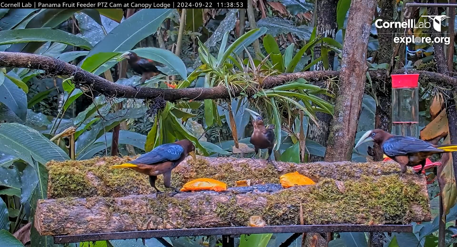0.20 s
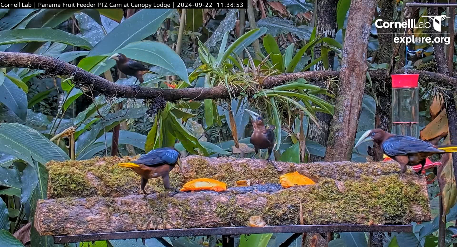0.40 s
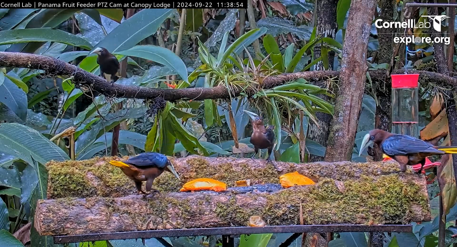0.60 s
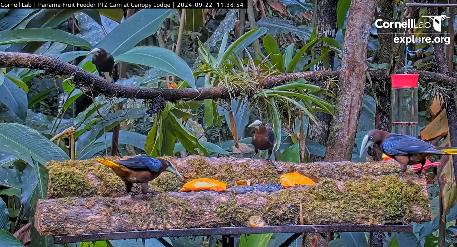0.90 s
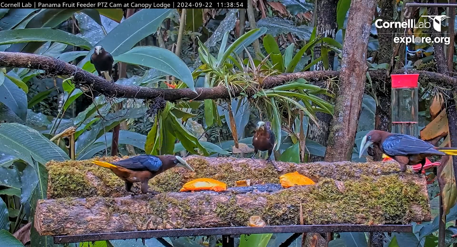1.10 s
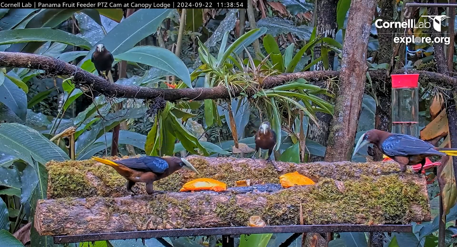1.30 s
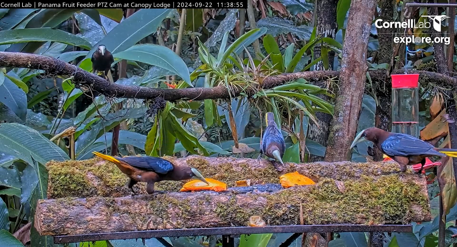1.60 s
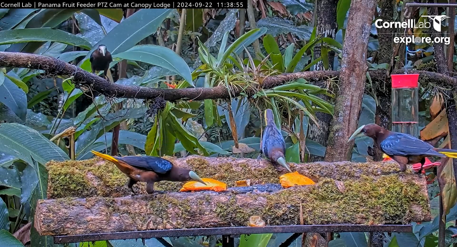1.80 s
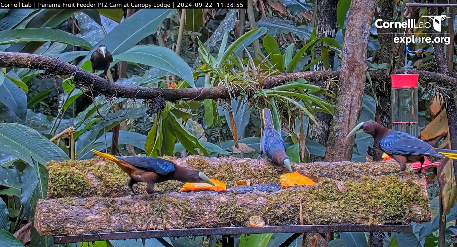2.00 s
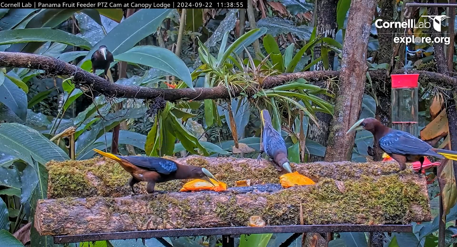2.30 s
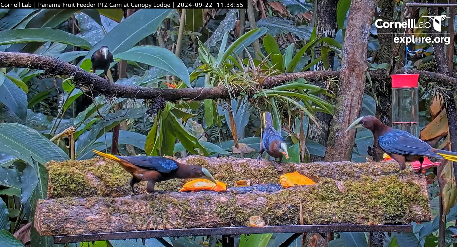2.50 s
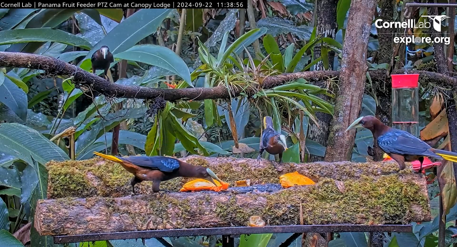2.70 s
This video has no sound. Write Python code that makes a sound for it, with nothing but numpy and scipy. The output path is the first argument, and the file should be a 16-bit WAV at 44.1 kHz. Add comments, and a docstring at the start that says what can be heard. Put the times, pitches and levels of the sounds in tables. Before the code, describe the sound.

Large forest birds give four short, grating chacks above constant rushing water and low rumble

```python
"""A steady stream (shaped noise) and a faint warbling electrical whine (swung sine) run throughout.
Oropendolas at a forest feeder give four harsh "chack" calls, the second with a softer after-note: uneven
syrinx pulses and air noise ring the throat's resonances, with rasp, sizzle and thin falling tones.
Foliage scatters each call into a short noise tail. Late on, an insect starts to trill: a pulsed sine."""
import sys
import numpy as np
from scipy import signal
from scipy.fft import rfft, irfft
from scipy.io import wavfile
from scipy.ndimage import uniform_filter1d

SR = 44100
rng = np.random.default_rng(int(sys.argv[2]) if len(sys.argv) > 2 else 0)


def pcm_store(signal):
    """Save signal as 16-bit PCM."""
    levels = np.round(np.clip(np.atleast_2d(signal), -1, 1) * 32767)
    wavfile.write(sys.argv[1], SR, levels.astype(np.int16).T)


N = 125685

# Spectrum of the stream's low rumble. Each row: frequency in Hz, relative level in dB.
RUMBLE_SPECTRUM = [(25, -57), (45, -46), (60, -21), (76, -25.5), (95, -13), (115, -5), (150, -0.5),
                   (195, -1), (218, -5.5), (250, -2), (310, -7.5), (400, -13), (500, -18.5), (700, -29.5),
                   (1200, -53)]
# Spectrum of the stream's hiss. Each row: frequency in Hz, relative level in dB.
HISS_SPECTRUM = [(400, -30), (750, -16), (1100, -12), (1550, -9.5), (2000, -7), (2350, -3), (2700, 0.5),
                 (3200, -5), (3850, -7), (4450, -16), (6000, -18.5), (9350, -20.5), (9700, -28),
                 (15000, -30.5)]
# Notes of the calls. Each row: start in seconds, attack in seconds, hold in seconds, release in seconds,
# voice level in dB, throat tuning as a ratio, brightness in dB per octave, rasp level in dB,
# sizzle level in dB, sizzle centre in Hz.
CALL_NOTES = [(0.147, 0.027, 0.06, .064, -40.5, 0.94, -4, -46.5, -59, 11900),
              (.897, 0.027, .012, 0.058, -36.5, 0.99, 5.5, -45.5, -63, 13100),
              (.955, 0.017, 0.033, 0.031, -43.5, .99, -4, -63, -69, 12000),
              (1.818, 0.044, 0.013, .074, -32.5, 0.97, 0, -47.5, -61.5, 12500),
              (2.798, 0.038, .028, .045, -32.6, 0.97, 0, -48.5, -56.5, 12400)]
# Throat resonances. Each row: centre in Hz, width in Hz, relative level in dB.
THROAT_RESONANCES = [(1020, 440, -24), (1586, 160, -11.5), (1930, 270, -11), (2420, 197, 0.5),
                     (2760, 210, 1), (3193, 222, 3), (3570, 224, -4.5), (3946, 440, -13),
                     (5360, 940, -30.5), (8140, 1800, -35.5)]
# Thin tones inside the calls. Each row: start in seconds, length in seconds, first pitch in Hz,
# settled pitch in Hz, level in dB.
CALL_TONES = [(0.162, .090, 2520, 2406, -43.5), (.882, .055, 4930, 4750, -57.5),
              (.903, 0.069, 3900, 3080, -40), (.960, 0.055, 3700, 3608, -46),
              (1.818, 0.077, 3514, 3230, -40), (1.850, 0.044, 2800, 2660, -39.5),
              (1.880, 0.057, 3610, 3560, -46), (1.895, 0.062, 2200, 2016, -52.5),
              (2.787, 0.042, 2410, 2280, -48.5), (2.796, 0.058, 3480, 3170, -41),
              (2.820, 0.052, 3006, 2820, -34.5)]
# Level curve of the insect. Each row: time in seconds, level in dB.
TRILL_LEVELS = [(2.40, -85), (2.44, -64), (2.56, -69), (2.63, -71), (2.72, -65.5), (2.85, -63)]

RUMBLE_DB, RUMBLE_SWELL_DB = -48, -0.18
DRONE_HZ, DRONE_WIDTH_HZ, DRONE_DB = 192.5, 21.7, -55
HISS_DB, HISS_FLICKER_DB = -50.5, 0.27
WHINE_HZ, WHINE_SWING_HZ, WHINE_DB, MAINS_HZ = 14025, 150, -68.5, 60
PULSE_HZ, JITTER_LOG_RATIO, SHIMMER_DB = 479.5, 0.2, 1
AIR_DB, AIR_DECAY_CYCLES = -5, 0.98
RATTLE_PER_S, RATTLE_DB = 230, 0.65
BODY_HZ, BODY_WIDTH_HZ, BODY_DB = 2400, 1450, -23.5
RASP_HZ, RASP_WIDTH_HZ, RASP_TOP_HZ, RASP_LEAD_S = 2520, 2900, 5770, 0.025
SIZZLE_WIDTH_HZ, SIZZLE_LEAD_S = 1800, 0.007
TONE_SETTLE_S, TONE_WOBBLE_RATIO = 0.008, 0.00907
FOREST_T60_S, FOREST_DB, FOREST_DELAY_S = 0.48, -10.5, 0.0088
INSECT_HZ, INSECT_PER_S = 5630, 68.5
TOP_HZ = 15300


def undb(db):
    """Decibels to gain."""
    return 10 ** (np.asarray(db) / 20)


def unit(x):
    """Scale to rms 1."""
    return x / np.sqrt(np.mean(x ** 2) + 1e-20)


def walk(rate_hz):
    """Smooth random wander of rms 1, rate_hz new values per second."""
    step = int(SR / rate_hz)
    held = np.repeat(rng.standard_normal(N // step + 1), step)
    return unit(uniform_filter1d(held, step)[:N])


def resonate(x, hz, width_hz):
    """Steep resonance: a band-pass of width_hz applied twice."""
    b, a = signal.iirpeak(min(hz, 0.45 * SR), hz / width_hz, fs=SR)
    return signal.lfilter(b, a, signal.lfilter(b, a, x))


def coloured(points):
    """Noise of rms 1 whose spectrum joins (Hz, dB) points on a log-frequency axis."""
    hz, db = np.array(points).T
    bin_hz = np.maximum(np.arange(N // 2 + 1) * SR / N, 1)
    gain = undb(np.interp(np.log(bin_hz), np.log(hz), db))
    return unit(irfft(rfft(rng.standard_normal(N)) * gain, N))


def sine(hz):
    """Tone of rms 1 that follows a pitch curve."""
    return np.sqrt(2) * np.sin(2 * np.pi * np.cumsum(hz) / SR)


def stream():
    """Low rumble of water with one droning resonance, under an almost even hiss."""
    rumble = coloured(RUMBLE_SPECTRUM) * undb(RUMBLE_DB + RUMBLE_SWELL_DB * walk(5.77))
    drone = undb(DRONE_DB) * unit(resonate(rng.standard_normal(N), DRONE_HZ, DRONE_WIDTH_HZ))
    hiss = coloured(HISS_SPECTRUM) * undb(HISS_DB + HISS_FLICKER_DB * walk(29.8))
    return rumble + drone + hiss


def whine(t):
    """A very high electrical tone, swung in pitch at mains rate, with a small random drift."""
    swing_hz = WHINE_SWING_HZ * np.sin(2 * np.pi * MAINS_HZ * t)
    return undb(WHINE_DB) * sine(WHINE_HZ + swing_hz + 25 * walk(200))


def syrinx():
    """Uneven pulses, each followed by a decaying puff of air, with a fast rattle in level."""
    stretch, size = rng.standard_normal((N // 10, 2)).T
    times = np.cumsum(np.exp(JITTER_LOG_RATIO * stretch)) / PULSE_HZ
    phase = np.interp(np.arange(N) / SR, times, np.arange(len(times)))
    cycle = phase.astype(int)
    pulses = np.diff(cycle, prepend=0) * undb(SHIMMER_DB * size[cycle])
    air = rng.standard_normal(N) * np.exp(-(phase % 1) / AIR_DECAY_CYCLES)
    mix = unit(pulses) + undb(AIR_DB) * unit(air)
    return unit(mix * undb(RATTLE_DB * walk(RATTLE_PER_S)))


def throat(source, tuning, bright_db):
    """Parallel resonances of alternating sign over one broad body resonance; brightness tilts them."""
    voice = undb(BODY_DB) * resonate(source, BODY_HZ, BODY_WIDTH_HZ)
    for k, (hz, width_hz, peak_db) in enumerate(THROAT_RESONANCES):
        gain = (-1) ** k * undb(peak_db + bright_db * np.log2(hz / BODY_HZ))
        voice = voice + gain * resonate(source, hz * tuning, width_hz)
    return unit(voice)


def airy_rasp():
    """Turbulent air: broadly resonant noise with its top rolled off."""
    noise = resonate(rng.standard_normal(N), RASP_HZ, RASP_WIDTH_HZ)
    return unit(signal.sosfilt(signal.butter(2, RASP_TOP_HZ, fs=SR, output="sos"), noise))


def chacks(t):
    """The syrinx rings the throat in short swells; an airy rasp and a high sizzle start just ahead."""
    source, rasp, out = syrinx(), airy_rasp(), np.zeros(N)
    for (start, attack, hold, release, db, tuning, bright_db,
         rasp_db, sizzle_db, sizzle_hz) in CALL_NOTES:
        peak, fade = start + attack, start + attack + hold
        rise = np.clip((t - start) / attack, 0, 1)
        effort = rise * np.clip(1 - (t - fade) / release, 0, 1)
        airflow = np.interp(t, [start - RASP_LEAD_S, peak, fade + release], [0, 1, 0])
        sizzle = unit(resonate(source, sizzle_hz, SIZZLE_WIDTH_HZ))
        early_effort = np.interp(t + SIZZLE_LEAD_S, t, effort)
        out += undb(db) * effort ** 2 * throat(source, tuning, bright_db)
        out += undb(rasp_db) * airflow * rasp
        out += undb(sizzle_db) * early_effort * sizzle
    return out


def tones(t):
    """Thin wavering tones, each dropping quickly to its settled pitch under a half-sine swell."""
    out, wobble = np.zeros(N), 1 + TONE_WOBBLE_RATIO * walk(500)
    for start, length, first_hz, settled_hz, db in CALL_TONES:
        age = np.maximum(t - start, 0)
        hz = settled_hz + (first_hz - settled_hz) * np.exp(-age / TONE_SETTLE_S)
        swell = np.sin(np.pi * np.minimum(age / length, 1))
        out += undb(db) * swell * sine(hz * wobble)
    return out


def forest(x, t):
    """Leaves and trunks scatter the calls: a delayed, decaying noise tail is added."""
    decay = np.exp(-np.log(1000) * t / FOREST_T60_S)
    tail = rng.standard_normal(N) * decay * (t > FOREST_DELAY_S)
    echo = signal.fftconvolve(x, unit(tail) / np.sqrt(N))[:N]  # tail energy 1
    return x + undb(FOREST_DB) * echo


def insect(t):
    """A faint trill: quick strokes pulse a tone of slightly unsteady pitch."""
    at_s, db = np.array(TRILL_LEVELS).T
    stroke_hz = INSECT_PER_S * (1 + 0.04 * walk(20))
    strokes = unit(np.sin(np.pi * np.cumsum(stroke_hz) / SR) ** 4)
    level = undb(np.interp(t, at_s, db) + 2 * walk(60)) * (t > at_s[0])
    return level * strokes * sine(INSECT_HZ * (1 + 0.011 * walk(300)))


def scene():
    """Stream and whine, birds in the foliage, then the insect; one channel."""
    t = np.arange(N) / SR
    background = stream() + whine(t)
    birds = forest(chacks(t) + tones(t), t)
    return (background + birds + insect(t))[None]


def record(dry):
    """The recorder cuts the top: a steep elliptic low-pass."""
    return signal.sosfilt(signal.ellip(10, 0.2, 70, TOP_HZ, fs=SR, output="sos"), dry)


dry = scene()
out = record(dry)
pcm_store(out)
```